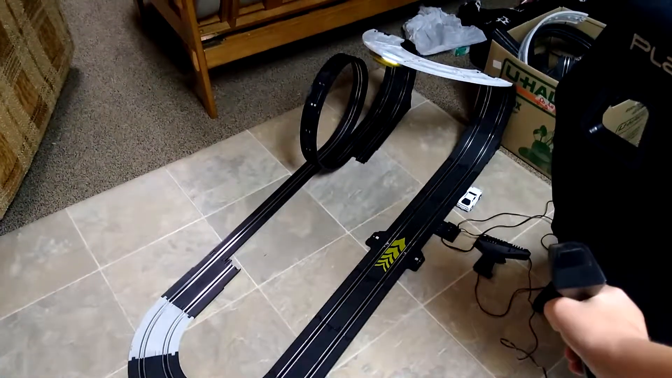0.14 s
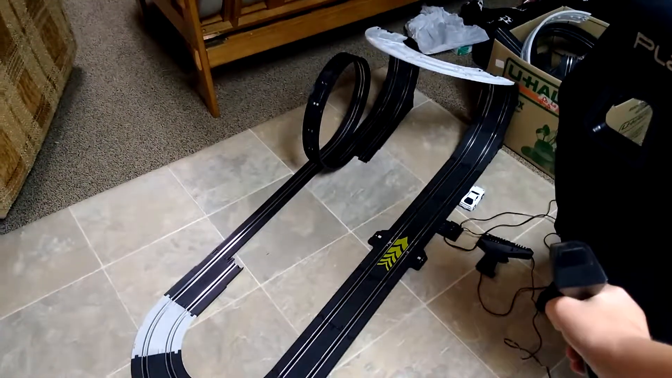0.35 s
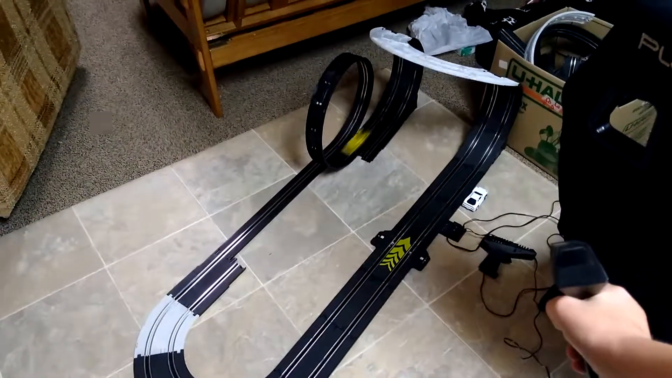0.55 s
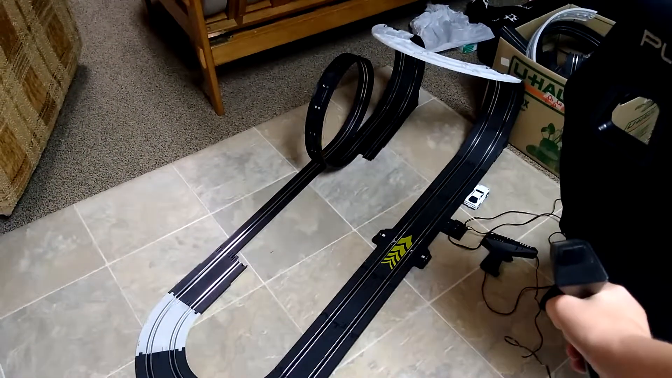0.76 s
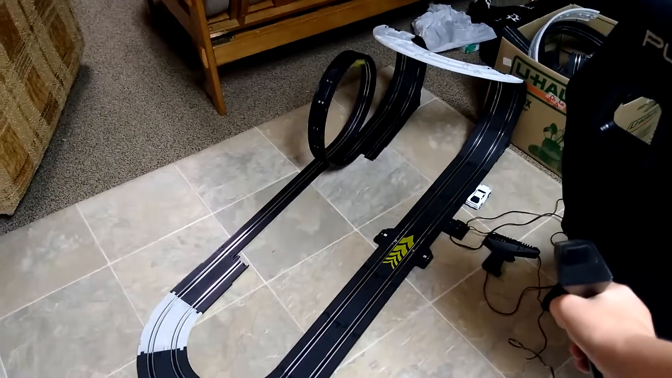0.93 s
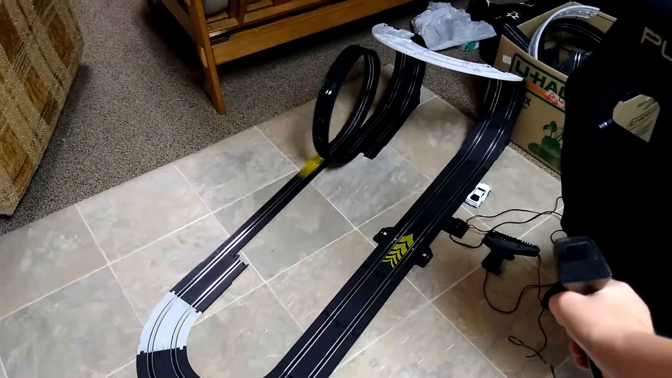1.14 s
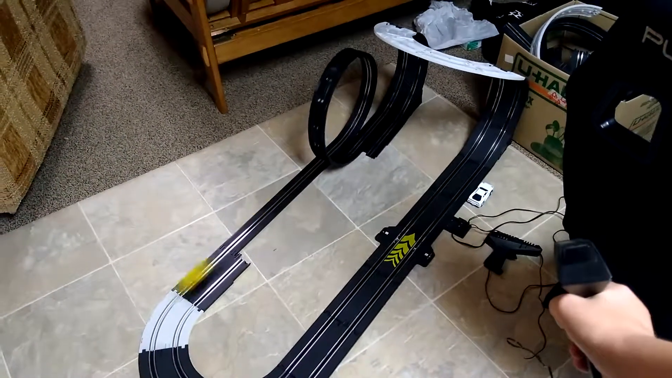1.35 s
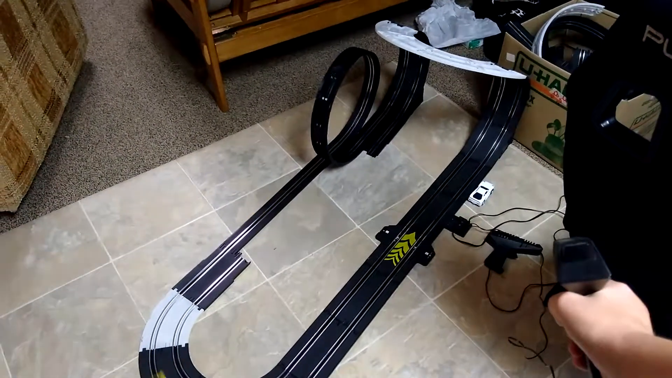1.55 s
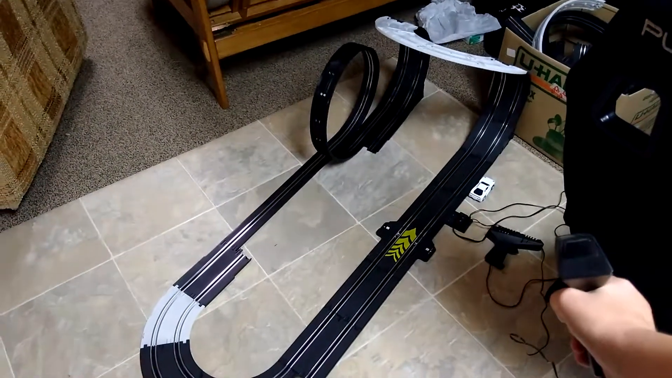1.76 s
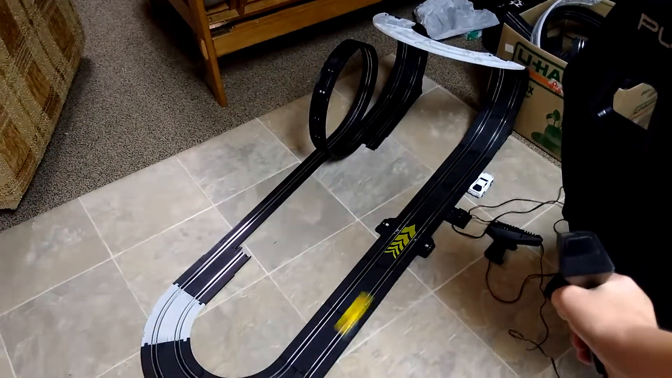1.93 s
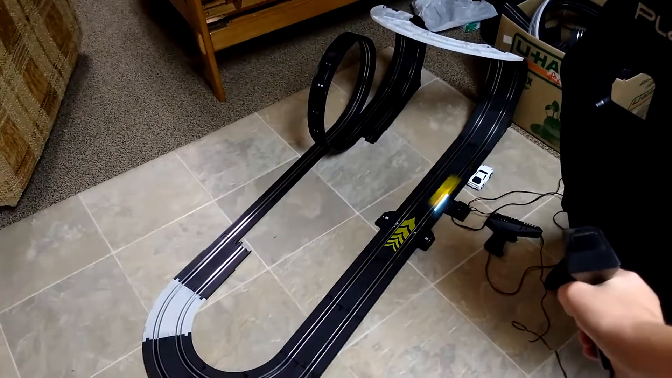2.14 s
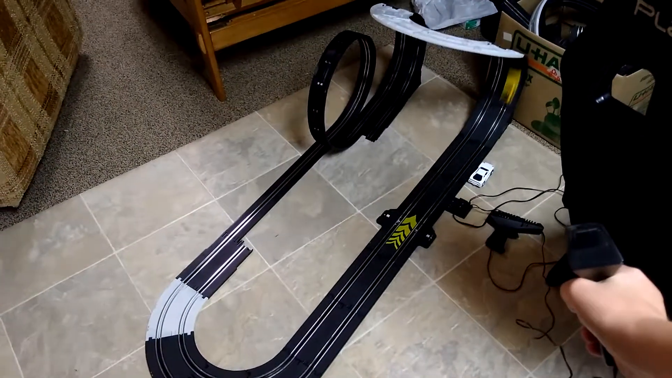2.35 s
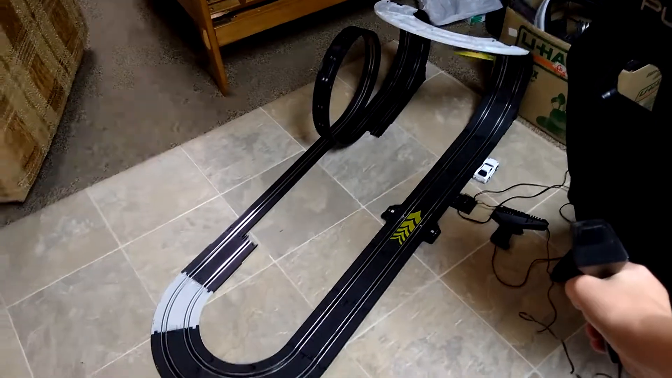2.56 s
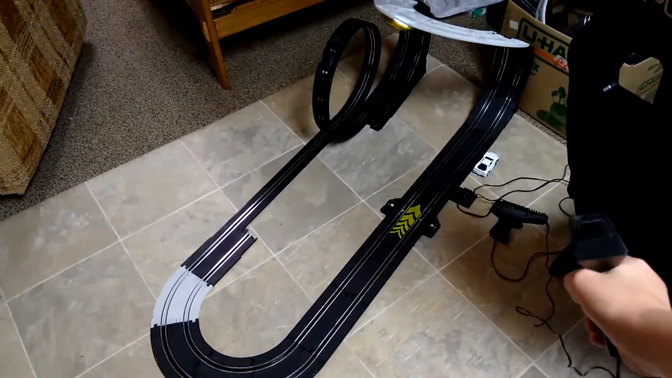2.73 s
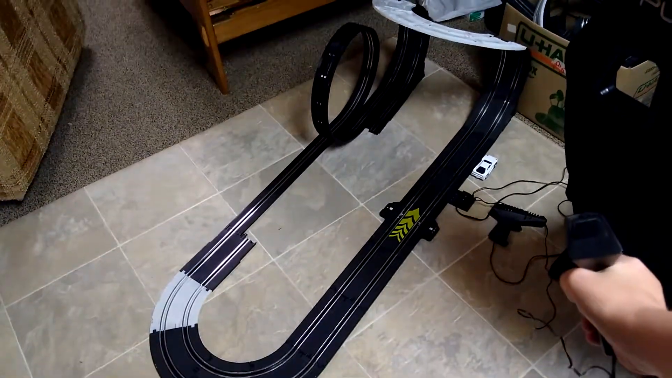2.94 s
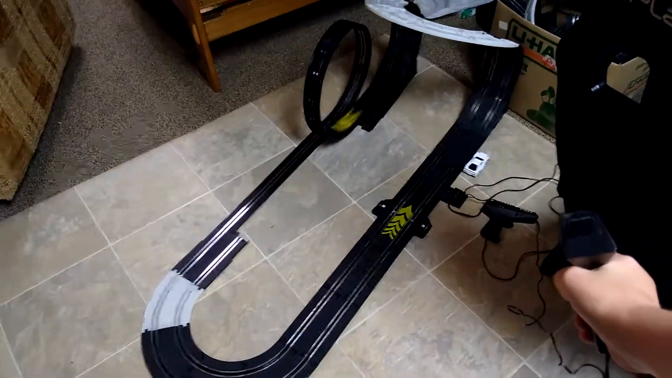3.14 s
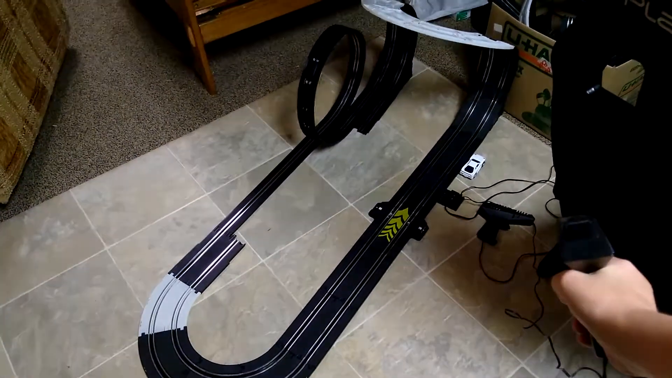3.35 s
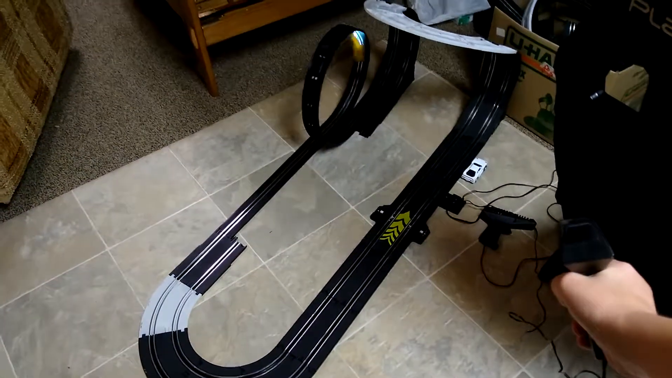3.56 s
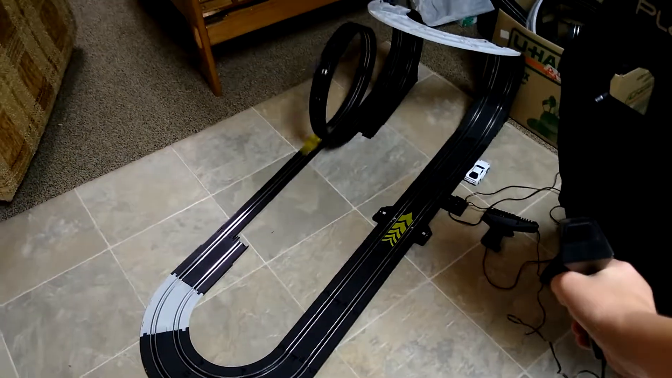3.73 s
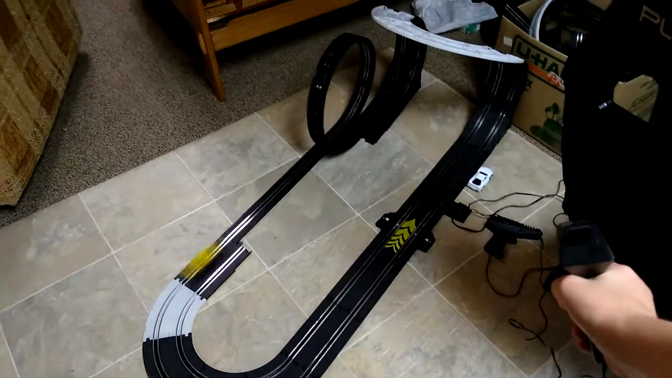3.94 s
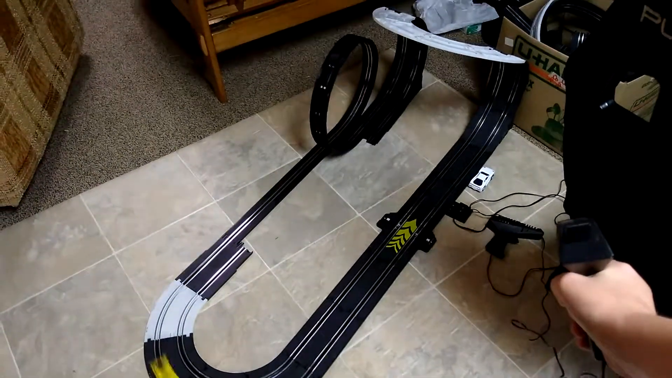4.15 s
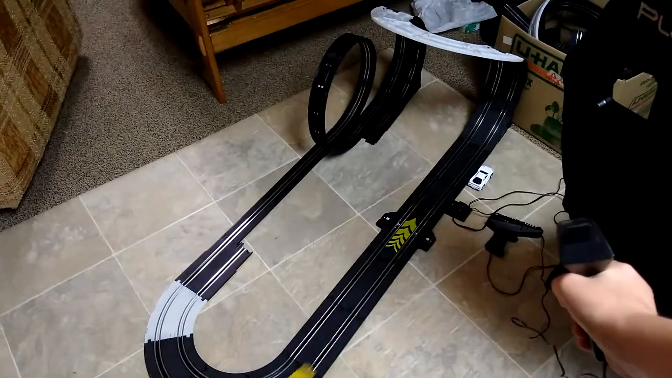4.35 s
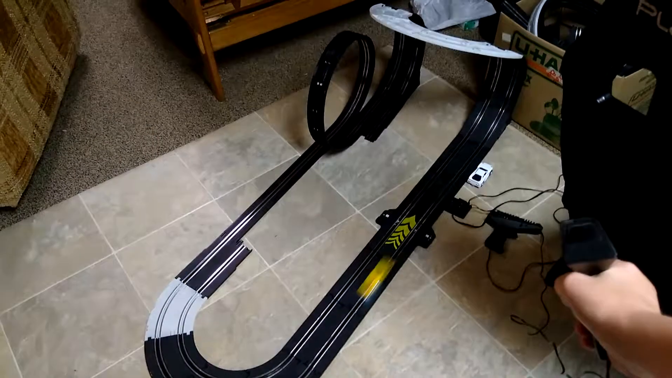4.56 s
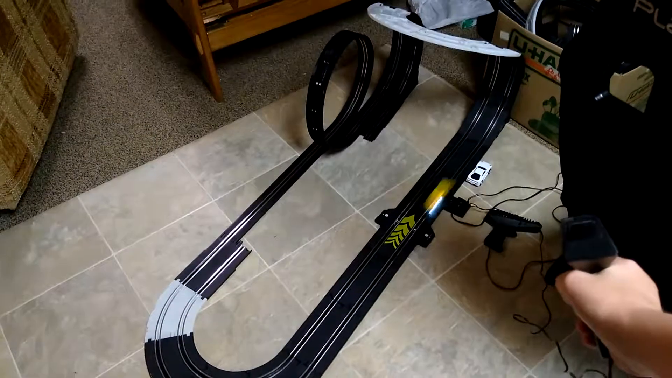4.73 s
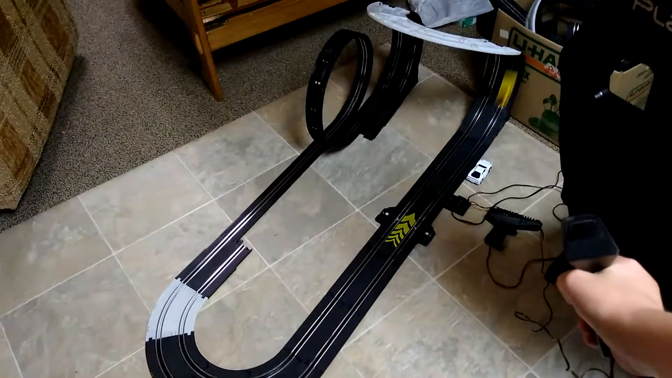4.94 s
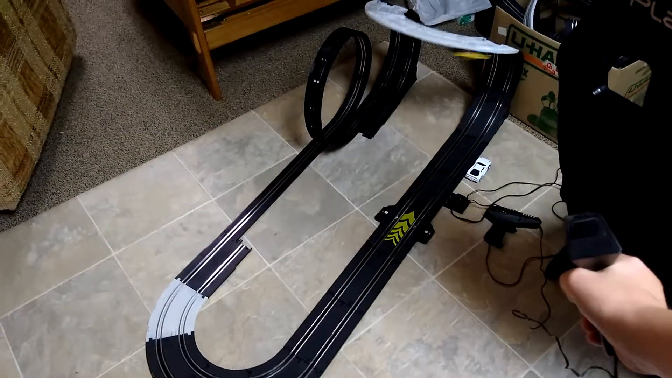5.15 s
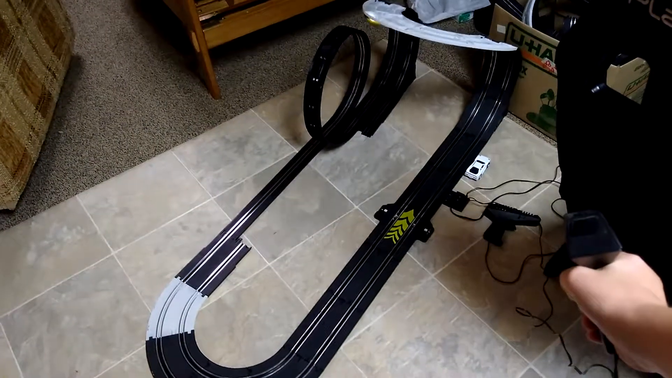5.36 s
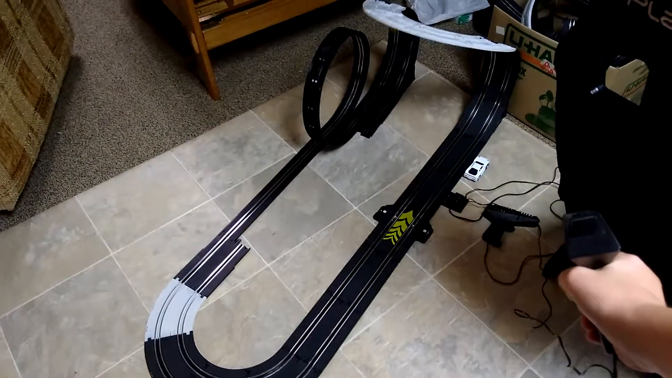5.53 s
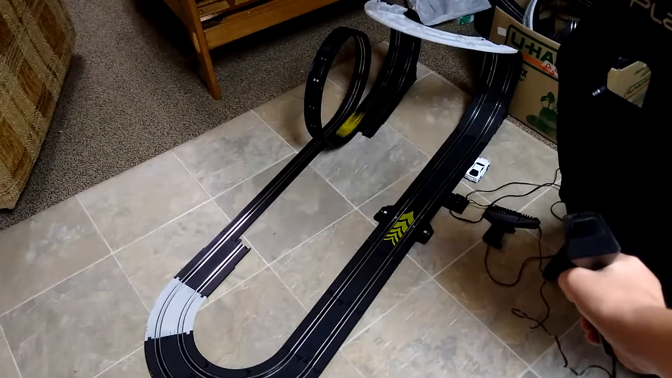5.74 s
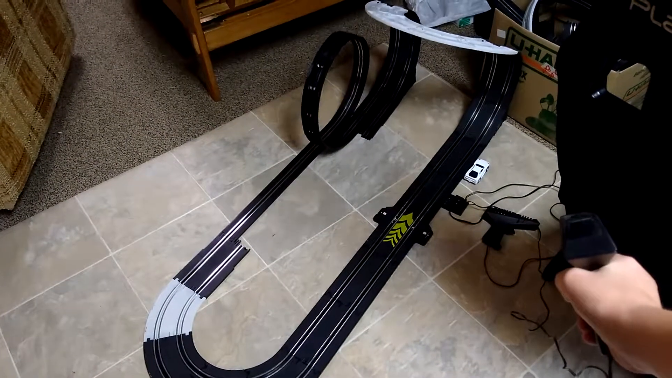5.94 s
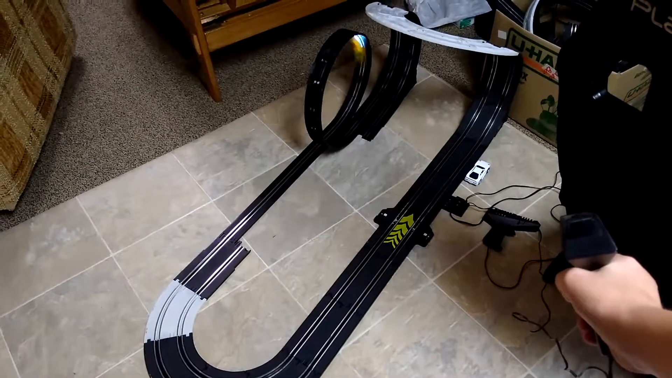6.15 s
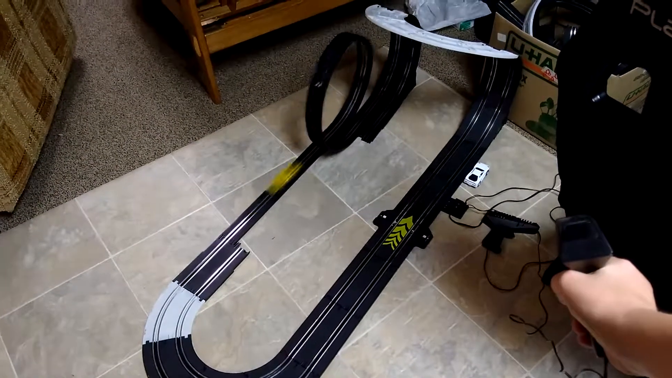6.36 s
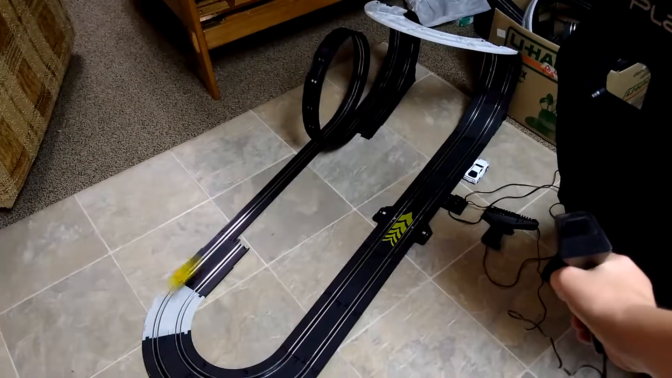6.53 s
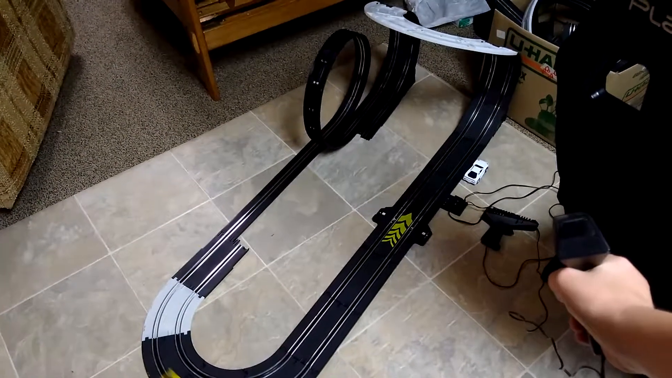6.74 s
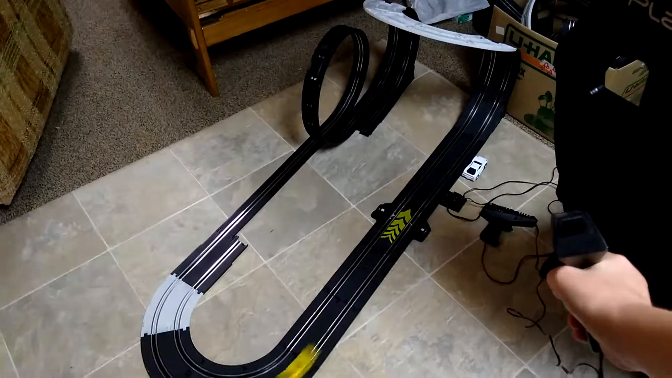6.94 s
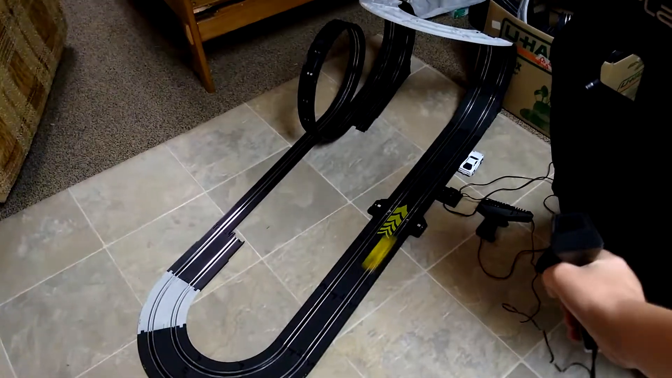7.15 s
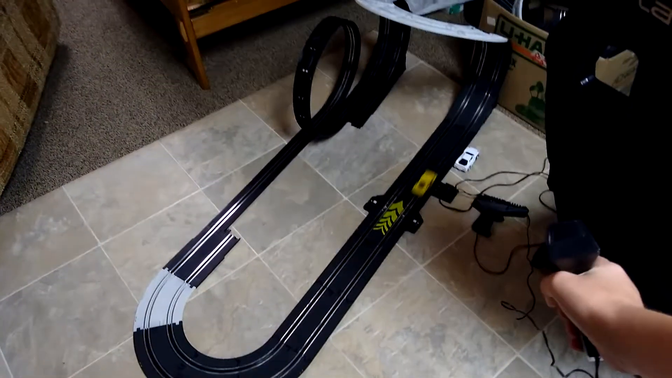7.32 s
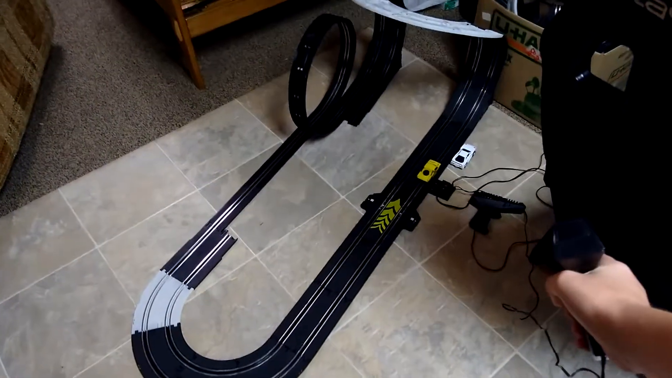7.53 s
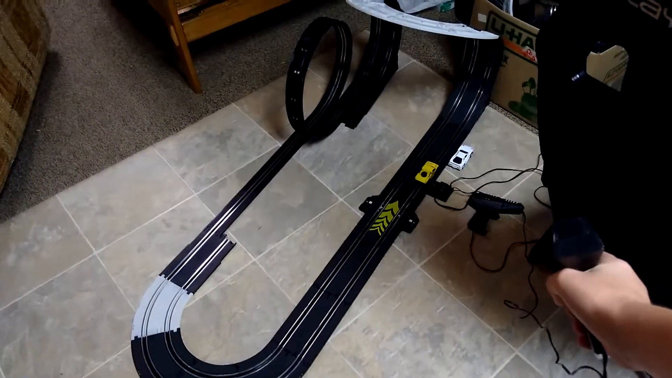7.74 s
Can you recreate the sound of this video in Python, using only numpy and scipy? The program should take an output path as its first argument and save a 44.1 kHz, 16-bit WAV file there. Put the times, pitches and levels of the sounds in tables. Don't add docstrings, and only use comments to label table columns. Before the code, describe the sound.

A continuous rough whir and hollow plastic rumble swells and thins as a little electric car circles a track and climbs a loop. Irregular knocks, sharp ticks and short ringing taps pepper it. Three hard lever clacks mark the laps, each briefly ducking the background. After the last, motion cuts off and quiet room tone slowly rises. Indoor phone microphone, the near passes shifting in stereo.

```python
import sys
import numpy as np
from scipy import signal
from scipy.fft import rfft, irfft, next_fast_len
from scipy.io import wavfile
from scipy.ndimage import uniform_filter1d

SR = 44100
rng = np.random.default_rng(int(sys.argv[2]) if len(sys.argv) > 2 else 0)


def elevation(decibels):
    levels = np.asarray(decibels, float)
    return 10 ** (levels / 20)


def put_to_file(sound):
    columns = np.atleast_2d(sound).T
    safe = np.clip(columns, -1, 1)
    whole_steps = np.round(safe * 32767)
    wavfile.write(sys.argv[1], SR, whole_steps.astype(np.int16))


N = 347949

# after_lever_s, drum_db, drum_pitch_hz, chassis_db, chassis_pitch_hz
TRACK_PIECES = [(.06, -52, 630, -52, 1194), (.17, -46, 700, -43, 1056), (.19, -44, 700, -39.5, 1050),
                (.5, -48.5, 915, -49.5, 1060), (.63, -45, 960, -46, 970), (.75, -47, 890, -51.5, 1090),
                (.872, -54, 797, -51, 1140), (.886, -45, 800, -39.5, 1150), (1.1, -42.5, 710, -38.5, 1020),
                (1.35, -48.5, 685, -48, 1236), (1.48, -47, 590, -44, 1100), (1.57, -39, 594, -37.5, 1226),
                (1.7, -42, 607, -40, 1300), (1.8, -39, 570, -40, 1286), (1.92, -40, 645, -36.5, 1275),
                (2.05, -39.5, 650, -44, 1670), (2.25, -38, 656, -37.5, 1580), (2.42, -39.5, 736, -36, 1710),
                (2.57, -32.5, 576, -36, 1570)]
# centre_hz, width_hz, level_db
SLAB_MODES = [(106.5, 24, -3), (144.5, 23.6, -3), (175.8, 17, 1), (246.7, 28, 0.5)]
# centre_hz, width_hz, level_db
TRACK_MODES = [(371, 89, -1), (554, 125, -1.5), (661, 82, -2.5), (868, 110, -3)]


def rolling():
    place, drive_db = lap_clock()
    drum_db, drum_hz, chassis_db, chassis_hz = on_lap(TRACK_PIECES)

    rumble_db_per_s, on_floor_s = 6.5, 2.21
    climb_db = rumble_db_per_s * np.maximum(on_floor_s - place, 0)
    duck_db = 3 * np.exp(-place / 0.11)
    rumble_db = -63.5 + rumble_db_per_s * on_floor_s - after_clack(place) * (climb_db + duck_db)
    slab = lambda hz: modes(SLAB_MODES)(hz) * band(hz + 1, 99.0, 0.91)
    rumble = unit(filtered(chatter(37, 2.12, t60=0.23, smooth=0.94), slab))

    def hollow(hz, at):
        colour = abs(modes(TRACK_MODES)(hz)) * band(hz, 470, 0.95)
        return colour * hump(hz, drum_hz[at], 4.6, 0.18)

    def frame(hz, at):
        colour = band(hz, 1730, 0.55) * hump(hz, chassis_hz[at], 16.0, 0.25)
        colour = colour * hump(hz, chassis_hz[at], 0.11, 0.035)
        return colour * hump(hz, 1067, 1.33, 0.035) * hump(hz, 1770, 0.45, 0.16)

    drum = streaked(chatter(200, 5.5, t60=0.03, smooth=2.26), 5.0, 0.063, hollow)
    chassis = streaked(chatter(160, 1.3, t60=0.04, smooth=1.96), 5.9, 0.1, frame)
    mix = elevation(rumble_db + 8.5) * rumble + elevation(drum_db) * drum + elevation(chassis_db) * chassis
    return elevation(drive_db) * mix


# after_lever_s, effort_db, gears_over_braids_db, loudest_shell_mode_hz
MOTOR_EFFORT = [(.1, -48.5, -3, 3450), (.16, -68, 15, 3470), (.19, -49.5, 6.5, 3460),
                (.54, -55.5, -2.5, 3650), (.58, -52, 0.5, 3800), (.87, -53.5, 2.5, 3920),
                (.886, -49.5, 7, 3430), (1.06, -45.5, 3, 3550), (1.14, -37.5, -0.5, 3200),
                (1.4, -42, 0, 3440), (1.52, -33.5, -1, 3270), (1.85, -42, -1, 3720),
                (1.97, -39.5, 3.5, 4200), (2.09, -47.5, -1.5, 4200), (2.21, -50.5, 0.5, 3500),
                (2.24, -44, 4, 4680), (2.42, -49.5, -10, 3650), (2.505, -53, 13.5, 2800)]
# centre_hz, width_hz, level_db
SHELL_MODES = [(1100, 550, -3.5), (2280, 570, 7), (2633, 300, 7), (2970, 110, 3), (3430, 230, 4),
               (4450, 240, 2)]
# pitch_hz, density_db_per_hz
BRAID_SPECTRUM = [(1500, -27), (4000, 3), (5200, -5.5), (6500, 0.5), (8500, 3), (12000, 2.5), (14000, 1.5),
                  (15000, -1.5), (16000, -1.5)]


def motor():
    effort_db, gear_db, gear_hz = on_lap(MOTOR_EFFORT)

    def shell(hz, at):
        colour = abs(modes(SHELL_MODES)(hz)) * band(hz, 2470, 1.0)
        return colour * hump(hz, gear_hz[at], 16.0, 0.19) * hump(hz, 2500, 0.48, 0.035)

    braid = lambda hz, at: elevation(along(BRAID_SPECTRUM, hz))
    gears = streaked(chatter(150, 22, t60=0.022, smooth=1.2), 6.8, 0.031, shell)
    braids = streaked(chatter(320, 11.0, t60=0.012, smooth=3.9), 5.3, 0.043, braid)
    drive_db = lap_clock()[1]
    return elevation(effort_db + drive_db) * (elevation(gear_db - 1.5) * gears + elevation(3.5) * braids)


# start_s, peak_db, pitch_hz
JOINT_THUMPS = [(0.189, -25.5, 967), (0.367, -30.5, 880), (0.482, -20.5, 1324), (0.573, -31, 1020),
                (0.996, -21, 1200), (1.121, -15, 640), (1.265, -12.5, 554), (1.405, -18.5, 550),
                (1.471, -21.5, 633), (1.728, -14.5, 587), (2.009, -18.5, 554), (2.254, -24.5, 760),
                (2.976, -25, 960), (3.124, -26, 1070), (3.648, -18, 580), (3.703, -14.5, 635),
                (3.825, -18, 1325), (3.848, -16, 570), (4.324, -17.5, 645), (4.433, -18.5, 720),
                (4.584, -17.5, 580), (4.835, -25, 864), (5.667, -17.5, 1076), (5.731, -18, 1080),
                (5.788, -24, 1100), (6.279, -18.5, 565), (6.421, -15.5, 586), (6.877, -19.5, 530),
                (6.984, -25.5, 770), (7.142, -16, 1420)]
# start_s, peak_db, pitch_hz
FURTHER_KNOCKS = [(0.394, -25, 1220), (0.506, -20, 1060), (1.063, -29, 1110), (1.299, -23.5, 1230),
                  (1.325, -22.5, 1180), (1.503, -22.5, 670), (1.745, -21, 600), (1.944, -21, 527),
                  (2.665, -29, 1030), (3.086, -20.5, 1204), (3.568, -28, 1150), (3.691, -26, 670),
                  (3.905, -24, 1510), (3.954, -25, 710), (4.047, -19.5, 724), (4.257, -22, 700),
                  (4.4, -22.5, 1465), (4.537, -18, 1466), (4.98, -24, 1042), (5.479, -26.5, 910),
                  (5.556, -34, 1020), (5.611, -20, 1100), (5.643, -24, 1327), (5.838, -23.5, 1185),
                  (5.949, -23.5, 607), (6.204, -31, 605), (6.226, -28, 650), (6.266, -19.5, 1390),
                  (6.402, -26, 600), (6.717, -28, 660), (7.026, -21, 1690), (7.11, -24, 1250),
                  (7.443, -50.5, 780), (7.48, -47.5, 800), (7.725, -49, 895)]


def joints():
    events = JOINT_THUMPS + FURTHER_KNOCKS
    out, luck = np.zeros((2, N + SR)), rng.random((len(events), 4))
    for (s, db, hz), chance in zip(events, luck):
        thump = ring(hz, 0.03, 0.00047, chance[:2])
        thump = thump + 0.36 * ring(0.657 * hz, 0.043, 0.0012, chance[1:3])
        rear_delay_s = 0.006 + 0.005 * chance[2]
        place_at(out, s, elevation(db - 4.5) * thump)
        place_at(out, s + rear_delay_s, elevation(db - 3.5 - 5.1 * chance[3]) * thump)
    return out[:, :N]


# start_s, peak_db, pitch_hz, hiss_db
PIN_TICKS = [(0.3676, -24.5, 3360, -17), (0.394, -22, 3480, -10), (0.4836, -26, 3430, -7.5),
             (0.6554, -23, 3360, -7), (0.83, -18, 3430, -24), (1.015, -19.5, 3990, 0),
             (1.2672, -21, 3660, -7), (1.393, -23, 3430, -18), (1.457, -29, 4150, -5),
             (1.7274, -43, 4100, -17), (2.009, -34.5, 2840, 1), (2.2518, -61, 3830, -8),
             (3.0852, -25, 3400, -31), (3.2256, -39, 3420, -4), (3.4503, -20, 3580, -14),
             (3.57, -23.5, 3430, 2.5), (3.598, -16, 3330, -3), (3.628, -18.5, 3240, -1),
             (3.6892, -14.5, 3290, -21), (4.3221, -31, 4300, -19), (4.584, -40, 2970, -8),
             (4.837, -29, 3270, -5), (4.8589, -28.5, 3640, -15), (5.0444, -24, 3460, -18),
             (5.477, -25, 3430, -11), (5.5527, -25.5, 3360, -5.5), (5.98, -21.5, 3430, -14),
             (6.1673, -25.5, 3430, 5.5), (6.2038, -40.5, 3460, -8), (6.2758, -25.5, 3350, -18),
             (7.1427, -22, 3300, -9)]
# start_s, peak_db, pitch_hz, hiss_db
FURTHER_TICKS = [(0.5067, -22, 3470, -19), (0.564, -34, 3430, -18), (0.7083, -26, 3440, -9),
                 (0.7918, -20, 3520, -20), (0.9068, -34, 3180, -12), (0.9597, -24, 3320, -6),
                 (0.9931, -27, 3430, -12), (1.0734, -20.5, 3430, -8), (1.2979, -22, 3530, -6),
                 (1.495, -27, 4080, -12), (1.6003, -26, 3400, -10), (2.3296, -32, 3460, -16),
                 (2.395, -35, 3410, -8), (2.9447, -45, 3430, -12), (2.9726, -40, 3300, -12),
                 (3.0076, -38, 3420, -16), (3.1702, -42, 3400, -12), (3.3657, -44, 3580, -14),
                 (3.3962, -33, 3340, -14), (3.5014, -26, 3430, -12), (3.5224, -31, 3360, -10),
                 (3.7668, -23, 3880, -12), (3.914, -33, 3500, -10), (4.9801, -32, 3370, -12),
                 (5.5348, -39, 3330, -16), (5.8092, -35, 3460, -12), (5.9449, -28, 3450, -14),
                 (6.112, -37, 3540, -12), (6.2253, -21, 3520, -11.5), (6.344, -43, 3320, -12),
                 (6.5829, -40, 4080, -14), (7.1075, -20, 2850, -21)]


def ticks():
    events = PIN_TICKS + FURTHER_TICKS
    out, luck = np.zeros((2, N + SR)), rng.random((len(events), 2))
    for (s, db, hz, _), turns in zip(events, luck):
        place_at(out, s, elevation(db - 5.5) * ring(hz, 0.034, 0.00032, turns))
    s, db, _, hiss_db = np.transpose(events)
    knock = sung(bursts(s, db - 18.5, 0.14, 0.00018), SHELL_MODES)
    spit = bursts(s, db + hiss_db - 6.0, 0.06, 0.0003)
    spit = filtered(spit, lambda hz: elevation(along(BRAID_SPECTRUM, hz)))
    return out[:, :N] + knock + spit


# start_s, blow_db, rebound_delay_s, rebound_db, scrape_db
LEVER_CLACKS = [
    (2.0699, -13.5, 0.028, -33.5, -35.5),
    (4.6589, -8, 0.016, -29.5, -32.5),
    (7.212, -11.5, 0.0286, -31, -33.5),
]
# centre_hz, width_hz, level_db
LEVER_MODES = [(1555, 1540, 1), (2130, 1270, 5), (3000, 640, 3.5), (4470, 1050, -3.5)]
# pitch_hz, density_db_per_hz
DRAG_SPECTRUM = [(1500, -21), (4000, -1), (5200, -3), (6500, -4), (8500, 1.5), (11500, 6), (14000, -1),
                 (16000, -6)]


def lever():
    s, blow_db, delay, rebound_db, scrape_db = np.transpose(LEVER_CLACKS)
    slap = bursts(s, blow_db - 5.0, 0.042, 0.001)
    slap = slap + bursts(s + 0.0089, blow_db - 6.0, 0.018, 0.00057)
    rebound = bursts(s + delay, rebound_db + 5.5, 0.11, 0.0019)
    rebound = rebound + bursts(s, rebound_db + 7.0, 0.23, 0.0084)
    scrape = bursts(s, scrape_db + 7.5, 0.32, 0.0067)
    scrape = scrape + bursts(s + delay, scrape_db + 11.0, 0.13, 0.0058)
    scrape = scrape + bursts(s - 0.006, scrape_db + 8.0, 0.073, 0.0039)
    scrape = scrape + bursts(s + 0.0058, scrape_db + 15.5, 0.01, 0.00044)
    after_s = rng.uniform(0.0076, 0.06, (len(s), 9))
    click_db = scrape_db[:, None] + 12.0 - 90 * after_s
    clicks = bursts((s[:, None] + after_s).ravel(), click_db.ravel(), 0.012, 0.00037)
    struck = sung(slap + rebound + 0.45 * clicks, LEVER_MODES)
    return struck + filtered(scrape + clicks, lambda hz: elevation(along(DRAG_SPECTRUM, hz)))


# pitch_hz, over_blow_db
ARM_RINGS = [
    (1680, -2),
    (1510, -15),
    (1506, -2.5),
]


def arm():
    out, luck = np.zeros((2, N + SR)), rng.random((len(ARM_RINGS), 2))
    for (s, blow_db, *_), (hz, db), turns in zip(LEVER_CLACKS, ARM_RINGS, luck):
        place_at(out, s, elevation(blow_db + db) * ring(hz, 0.035, 0.001, turns))
        place_at(out, s + 0.005, elevation(blow_db + db - 0.5) * ring(hz, 0.03, 0.0011, turns))
    return out[:, :N]


# start_s, level_db, pitch_hz, length_s
SINGING_PIECES = [(0.44, -34, 778, .03), (0.533, -26, 1042, 0.028), (0.56, -30, 1030, 0.023),
                  (3.124, -30.5, 1060, .03), (5.567, -33, 1100, .025), (5.703, -27.5, 1052, 0.061),
                  (5.787, -34, 1058, 0.023), (6.874, -31.5, 567, 0.042), (7.141, -16, 1400, 0.0091),
                  (7.147, -34, 600, 0.034)]


def singing():
    out, luck = np.zeros((2, N + SR)), rng.random((len(SINGING_PIECES), 3))
    for (s, db, hz, length), chance in zip(SINGING_PIECES, luck):
        u = np.linspace(0, 1, round(length * SR))
        sway = 0.41 * np.sin(2 * np.pi * (1.1 * u + chance[2]))
        tone = np.sin(2 * np.pi * (hz * length * u + chance[:2, None]) + sway)
        swell = np.sin(np.pi * u ** 0.97) ** 1.17
        place_at(out, s, elevation(db) * swell * tone)
    return out[:, :N]


# start_s, peak_db, pitch_hz
GUIDE_TAPS = [(0.102, -31.5, 824), (0.239, -33, 746), (0.299, -43, 1180), (2.307, -31, 1080),
              (2.329, -33, 982), (2.389, -36, 1030), (2.524, -34, 1040), (2.646, -34, 1010),
              (2.693, -36, 1030), (2.78, -34, 940), (2.869, -37, 726), (3.918, -22, 1100),
              (3.99, -24.5, 974), (4.8, -30, 1060), (4.859, -28, 1190), (4.874, -32, 1110),
              (4.889, -32, 1090), (4.917, -27, 1190), (4.954, -32, 1070), (4.999, -29, 1060),
              (5.05, -35, 1070), (5.07, -30, 1010), (5.211, -42, 920), (5.264, -30, 880), (5.32, -28, 896),
              (5.339, -30.5, 900), (6.299, -26, 630), (6.484, -27.5, 608), (6.499, -27, 641),
              (6.568, -28, 1040), (6.899, -23.5, 750)]
# start_s, peak_db, pitch_hz
SHELL_PINGS = [(0.83, -26, 3430), (3.4498, -24.5, 3430), (5.9803, -14.5, 3430), (6.1677, -23.5, 3430),
               (6.2253, -20.5, 3560)]


def taps():
    events = GUIDE_TAPS + SHELL_PINGS
    out, luck = np.zeros((2, N + SR)), rng.random((len(events), 2))
    for (s, db, hz), turns in zip(events, luck):
        place_at(out, s, elevation(db) * ring(hz, 0.028, 0.00046, turns))
    return out[:, :N]


# pitch_hz, density_db_per_hz
AIR_SPECTRUM = [(30, -17), (60, -2), (170, -1.5), (300, -7), (480, -12.5), (750, -14.5), (1100, -25.5),
                (2000, -26), (4000, -31.5), (7000, -37.5), (9000, -35.5), (15500, -43.5)]
# centre_hz, width_hz, over_room_db
HUM_MODES = [(132, 4, -2.5), (201, 24, 4.5), (453, 12, 8.5), (692, 11, 7), (756, 8.9, 14.5), (797, 9.8, 6),
             (967, 13, 14.5)]
# centre_hz, width_hz, level_db
DRONE_MODES = [(57.5, 8, -13), (175, 18, -2), (200, 20, 2.5)]


def room_tone():
    air_spectrum = lambda hz: elevation(along(AIR_SPECTRUM, hz)) * (1 + abs(modes(HUM_MODES)(hz)))
    air = filtered(rng.standard_normal((2, N)), air_spectrum)
    place = lap_clock()[0]
    silent_s = np.maximum(np.arange(N) / SR - CAR_STARTS[-1][0] - 0.046, 0)
    lift_db = 12.5 * silent_s - 10 * after_clack(place) * np.exp(-place / 0.81)
    late = np.clip(0.74 * np.exp(-(place / 0.21) ** 2), 0, 1)
    air = air - late * filtered(air, lambda hz: band(hz + 1, 400, 0.51))
    drone = filtered(rng.standard_normal((2, N)), modes(DRONE_MODES))
    return elevation(-49 + lift_db) * unit(air) + elevation(-57.5 + 0.48 * lift_db) * unit(drone)


# start_s, push_into_climb_db
CAR_STARTS = [
    (-0.51, 0),
    (2.071, -2.5),
    (4.663, 0),
    (7.213, 1.5),
]


def lap_clock():
    lap_s, loop_s = 2.583, 0.88
    t = np.arange(N) / SR
    start, push_db = np.transpose(CAR_STARTS)
    marks = np.ravel([(s, s + loop_s) for s in start])
    distance = np.ravel([(k * lap_s, k * lap_s + loop_s) for k in range(len(start))])
    lap, place = np.divmod(np.interp(t, marks, distance), lap_s)
    push = push_db[lap.astype(int)] * np.clip(1 - place ** 4, 0, 1)
    return place, push - 174 * np.maximum(t - start[-1], 0)


def on_lap(rows):
    s, *cols = np.transpose(rows)
    place = lap_clock()[0]
    return [np.interp(place, s, c, period=2.583) for c in cols]


def after_clack(place):
    return np.minimum(place / 0.022, 1)


def ring(hz, t60, rise, turns):
    t = np.arange(SR // 12) / SR
    tone = np.sin(2 * np.pi * (hz * t + turns[:, None]))
    return tone * elevation(-60 * t / t60) * (1 - np.exp(-t / rise))


def place_at(out, s, sound):
    out[:, round(s * SR):][:, :sound.shape[1]] += sound


def chatter(rate, spread_db, t60, smooth):
    hits = (rng.random(N) < rate / SR) * elevation(spread_db * rng.uniform(-0.59, 1, N))
    shape = signal.lfilter([1], [1, -elevation(-60 / (t60 * SR))], hits)
    return unit((smooth + unit(shape)) * rng.standard_normal((2, N)))


def bursts(times, dbs, t60, rise):
    marks = np.bincount((np.asarray(times) * SR).astype(int), elevation(dbs), N)[:N]
    t = np.arange(SR // 4) / SR
    envelope = elevation(-60 * t / t60) * (1 - np.exp(-t / rise))
    return signal.fftconvolve(marks, envelope)[:N] * rng.standard_normal((2, N))


def streaked(x, depth_db, hold, shape):
    top = 1.6
    hz, at, z = frames(x)
    field = uniform_filter1d(rng.standard_normal(z.shape[1:]), size=2, axis=0)
    field = signal.lfilter([1], [1, -np.exp(-512 / SR / hold)], field)
    streaks = elevation(depth_db * top * np.tanh(unit(field) / top))
    colour = shape(hz, at) * np.ones(len(at))
    colour_rms = np.sqrt(np.mean(colour ** 2, axis=0))
    return unit(joined(z * streaks * colour / colour_rms))


def modes(table):
    def response(f):
        total = 0
        for k, (centre, width, db) in enumerate(table):
            loss = 1j * f * width
            total = total + (-1) ** k * elevation(db) * loss / (centre * centre - f * f + loss)
        return total
    return response


def sung(x, table):
    hz = np.linspace(0, SR / 2, 4096)
    return filtered(x, modes(table)) / np.sqrt(np.mean(abs(modes(table)(hz)) ** 2))


def hump(hz, centre_hz, height, width):
    return 1 + height / (1 + (np.log(hz / centre_hz) / width) ** 2)


def band(hz, centre_hz, width):
    return 1 / (1 + (np.log(hz / centre_hz) / width) ** 4)


def filtered(x, response):
    m = next_fast_len(N + 8192)
    return irfft(rfft(x, m) * response(np.fft.rfftfreq(m, 1 / SR)), m)[..., :N]


def frames(x):
    hz, t, z = signal.stft(x, SR, nperseg=1024)
    return hz[:, None] + 1, np.minimum((t * SR).astype(int), N - 1), z


def joined(z):
    return signal.istft(z, SR, nperseg=1024)[1][:, :N]


def unit(x):
    return x / np.sqrt(np.mean(x ** 2) + 1e-20)


def along(points, hz):
    f, v = np.transpose(points)
    return np.interp(np.log(hz + 1), np.log(f + 1), v)


def curves(rows):
    s, *cols = np.transpose(rows)
    return [np.interp(np.arange(N) / SR, s, c) for c in cols]


# pitch_hz, likeness_0_to_1
PORT_LIKENESS = [(100, .84), (250, .91), (600, .84), (1200, .3), (1900, .08), (2700, .05), (4500, .1),
                 (9000, .3), (15000, .3)]
# pitch_hz, left_minus_right_db
PORT_LEAN = [(100, -2), (250, -3), (900, -1), (1600, -6.5), (2300, -4), (3000, 7), (4500, -3), (8000, -3.5),
             (12000, -7), (15500, -2)]
# pitch_hz, lead_rad
PORT_LEAD = [(100, 0.37), (350, 0.041), (800, 0.28), (2000, 0), (7000, 0.25), (10000, 1.8), (13000, 1.2)]
# before_lever_s, left_minus_right_db, direct_0_to_1, left_lead_us, upper_mode_db, lower_mode_db
CAR_BEARING = [(1.66, -1, 0.05, 213, 2, 1), (1.5, -3.1, 0.05, 200, -12, 3), (2, 0.5, 0.23, 165, -8, -3),
               (0.91, -0.84, 0.16, 220, 1.5, 2), (0.9, -0.82, 0.54, 200, -1, -1),
               (0.56, -1.4, 0.49, 200, 4, -6), (0.52, 0.76, 0.77, 240, 8.5, -1),
               (0.23, 2, 0.76, 213, 7.5, 0), (0.104, -0.96, 0.3, 185, -1, 3), (-0.1, 0, 0.2, 260, 4.5, 2),
               (-0.54, -1.5, 0.2, 230, 1.5, 2.5), (-0.5, -1.9, 0.33, 210, 0, 0)]


def ports(pair):
    hz, at, (a, b) = frames(pair)
    passes = [(clack[0] - before, *row) for clack in LEVER_CLACKS for before, *row in CAR_BEARING]
    pan_db, direct, lead_us, upper_db, lower_db = (c[at] for c in curves(passes))
    reach = band(hz, 2250, 0.6)
    likeness = np.maximum(along(PORT_LIKENESS, hz), direct * reach)
    turn = np.arccos(np.clip(likeness, -1, 1)) / 2
    half_phase = 0.5 * along(PORT_LEAD, hz) * (1 - reach) + np.pi * hz * lead_us * 1e-6 * reach
    half = elevation((along(PORT_LEAN, hz) + pan_db) / 2) * np.exp(1j * half_phase)
    mid, side = np.cos(turn) * a, np.sin(turn) * b
    left, right = (mid + side) * half, (mid - side) / half
    facing_db = upper_db * band(hz, 5050, 0.1) + lower_db * band(hz, 2540, 0.15)
    extra = (elevation(facing_db) - 1) * (left + right) / 2
    return joined(np.array([left + extra, right + extra]))


def scene():
    car = rolling() + motor() + joints() + ticks() + singing() + taps()
    return ports(car + lever() + arm() + room_tone())


def low_pass(x):
    return signal.sosfilt(signal.butter(12, 15830, fs=SR, output="sos"), x)


# pitch_hz, share_0_to_1
CROSS_SHARE = [(100, 0.74), (2450, 0.72), (5000, 0.55), (7400, 0.46), (10000, 0.21), (16000, 0.02)]
# pitch_hz, lead_rad
CROSS_PHASE = [(1150, -0.016), (2450, 0.044), (3850, 0.18), (5000, 0.089), (6100, -0.59), (7400, 0.33)]


def record(dry):
    def echo(hz):
        phase = along(CROSS_PHASE, hz) - 2 * np.pi * hz / 2433
        return np.clip(along(CROSS_SHARE, hz), 0, 1) * np.exp(1j * phase)

    def comb(hz):
        band_limit = 1 + (hz / 15500) ** 160
        return np.array([1 - echo(hz), 1 + echo(hz)]) / band_limit

    mid_side = np.array([dry[0] + dry[1], dry[0] - dry[1]])
    mid, side = elevation(-7.0) * filtered(mid_side, comb)
    return low_pass(np.array([mid + side, mid - side]))


dry = scene()
out = record(dry)
put_to_file(out)
```